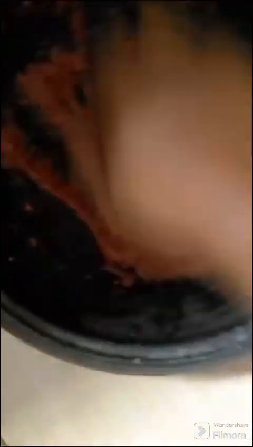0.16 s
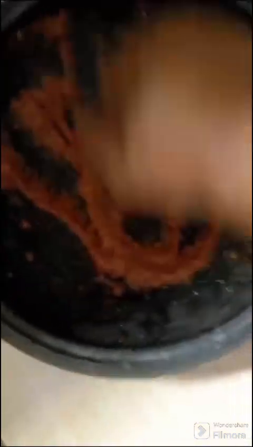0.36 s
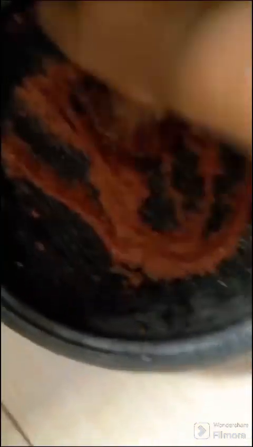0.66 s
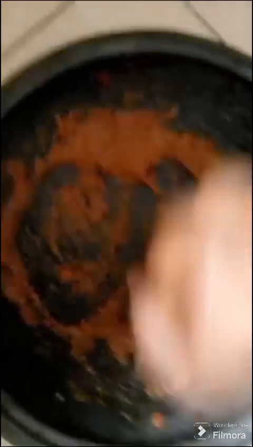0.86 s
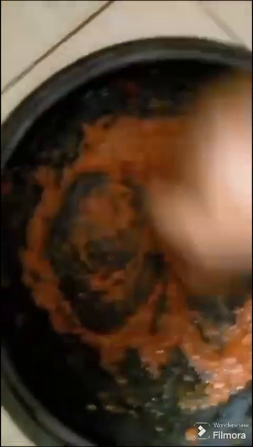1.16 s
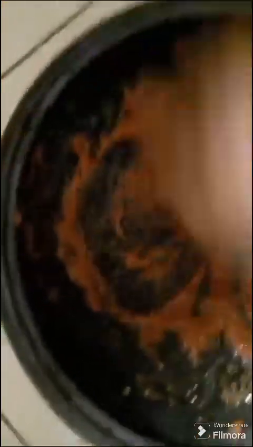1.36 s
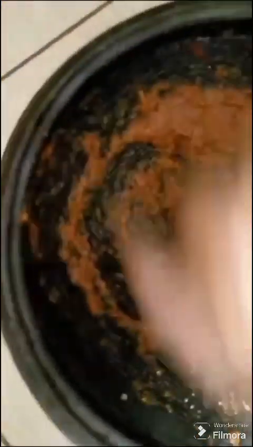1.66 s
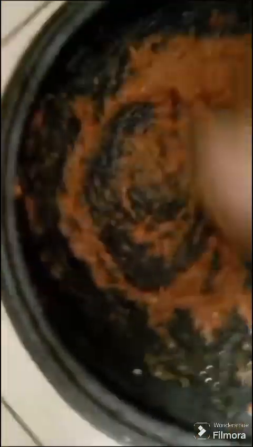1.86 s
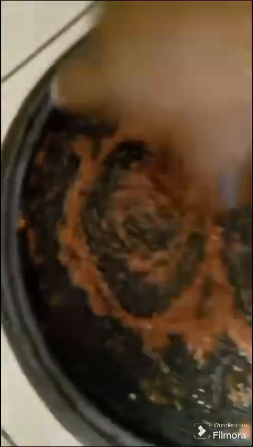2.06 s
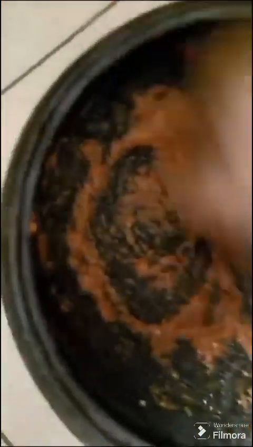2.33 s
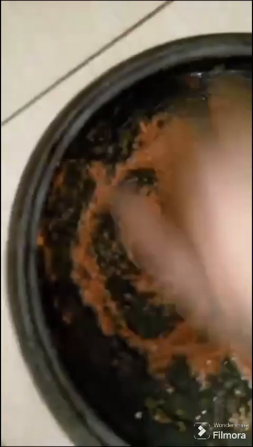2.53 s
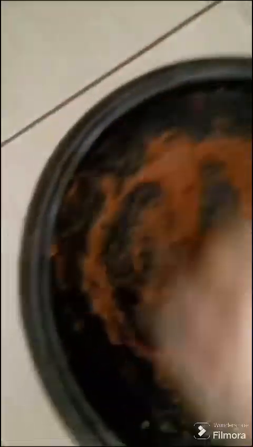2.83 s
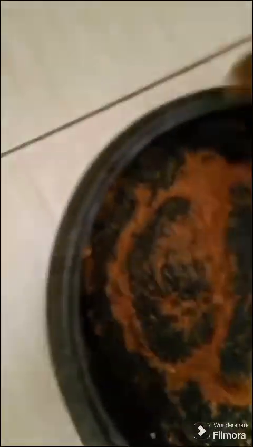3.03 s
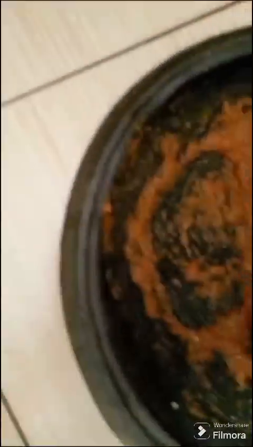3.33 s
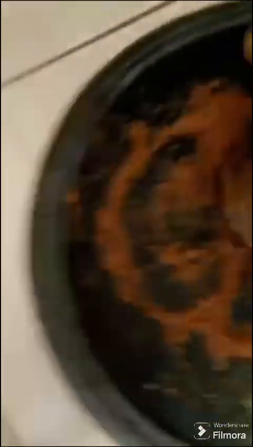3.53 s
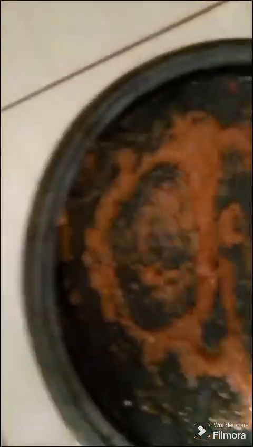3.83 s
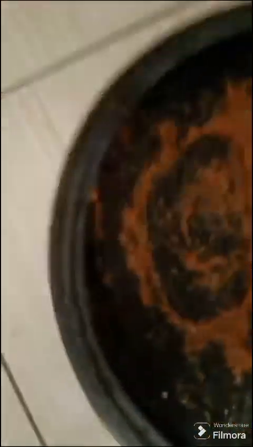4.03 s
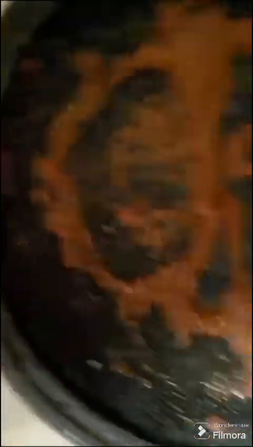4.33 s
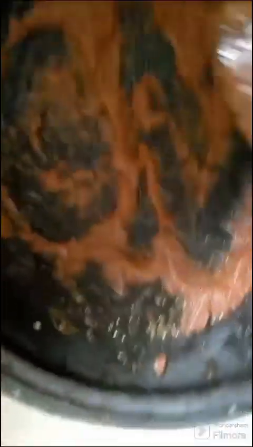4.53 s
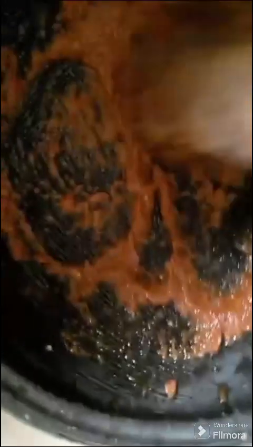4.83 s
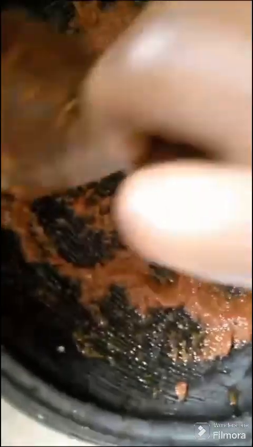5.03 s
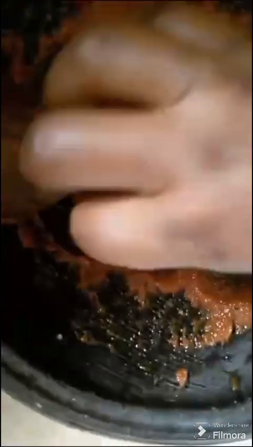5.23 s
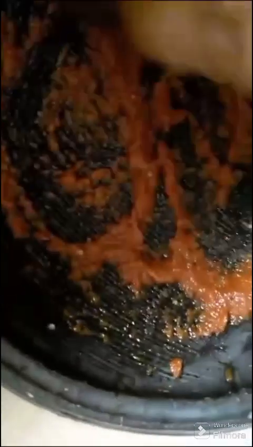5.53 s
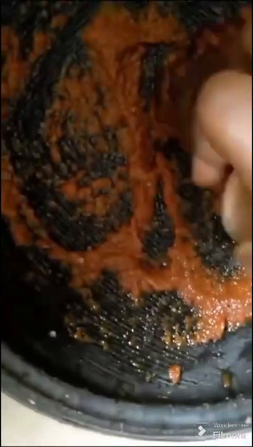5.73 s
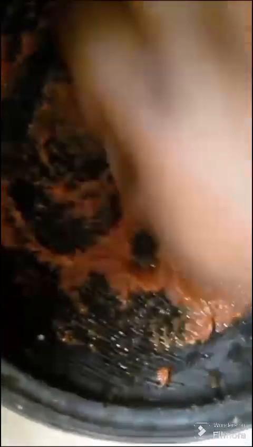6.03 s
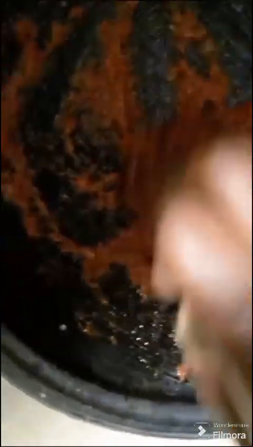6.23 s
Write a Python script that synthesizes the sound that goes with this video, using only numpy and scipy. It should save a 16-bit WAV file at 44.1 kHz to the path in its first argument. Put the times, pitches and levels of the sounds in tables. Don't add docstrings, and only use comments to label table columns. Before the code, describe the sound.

Rapid wet scrapes swell and die every fraction of a second, wood rubbing over rough clay with paste hiss and small crackles. An abrupt tiny gap breaks the early grinding, then heavier thumps and bright knocks join in. A long lull of faint room hum follows, before quieter grinding resumes near the end. The microphone is very close, with faint short reflections from the hard floor and walls.

```python
import sys
import numpy as np
from scipy import signal
from scipy.fft import rfft, irfft
from scipy.io import wavfile
from scipy.ndimage import uniform_filter1d, minimum_filter1d

SR = 44100
rng = np.random.default_rng(int(sys.argv[2]) if len(sys.argv) > 2 else 0)


def natural_amplitude(level_db):
    exponent = np.asarray(level_db, float) / 20
    return 10 ** exponent


def dump(signal):
    limited = np.clip(np.atleast_2d(signal).T, -1, 1)
    pcm = np.round(limited * 32767).astype(np.int16)
    wavfile.write(sys.argv[1], SR, pcm)


N = 281799

# (peak time [s], scrape level
# [dB], rise [s], fall [s], weight on the bowl [dB])
STROKES = [(0.0, -29, .05, 0.025, 1.5), (.09, -41, 0.11, 0.15, -2), (.25, -28.5, 0.069, 0.054, -8.5),
           (.375, -40.5, .05, 0.07, 0.5), (.435, -38.5, 0.077, 0.076, -1), (.575, -38, 0.044, .12, -2),
           (.69, -40, 0.0059, 0.0045, -22), (.85, -39.5, 0.05, 0.13, 3.5), (.96, -46, 0.12, 0.18, -3),
           (1.055, -34.5, 0.058, 0.049, -2.5), (1.21, -36.5, .045, .13, -1.5),
           (1.39, -32.5, 0.047, 0.056, 1.5), (1.56, -36.5, 0.029, 0.099, 3.5),
           (1.66, -40, 0.079, 0.2, -0.5), (1.755, -31.5, 0.059, 0.026, 8), (1.915, -32.5, 0.048, 0.043, 0),
           (2.0, -43, .08, 0.17, -6), (2.066, -32, 0.053, 0.068, -4.5), (2.338, -34.5, 0.05, 0.05, 4.5),
           (2.45, -41, 0.076, 0.09, -3), (2.59, -34, 0.069, 0.059, 6.5), (2.72, -38.5, 0.026, 0.14, 1.5),
           (2.915, -34, 0.044, 0.04, 0), (2.96, -45.5, 0.023, 0.039, 5),
           (3.269, -33, 0.063, 0.074, 9.2), (3.505, -38.5, 0.12, 0.047, 0.7),
                (5.41, -54, .012, .06, 0), (5.48, -48, 0.08, 0.1, 0), (5.681, -43, .11, 0.075, 4.3),
                (6.15, -40.5, 0.085, 0.079, 13.5), (6.378, -65.5, 0.032, .05, 20)]
TOUCHES = [
    (3.56, -57, .04, .085, -6),
    (5.055, -57.5, .06, .12, 1),
]
# (peak time [s], scrape level [dB], fall
# [s], weight on the bowl [dB])
ABRUPT_SOUNDS = [(.553, -43.5, 0.034, -3), (0.685, -44, 0.017, -14), (.82, -44.5, .04, 0.5),
                 (1.193, -36.5, .04, -2.5), (1.545, -38, .03, -0.5), (2.711, -42, .03, 0), (5.002, -66, .04, 8),
                 (5.625, -48, .03, 5), (2.255, -52, 0.035, 16), (3.135, -30.5, 0.056, -3.5),
                 (5.344, -61.5, 0.17, 17), (6.01, -43, 0.078, 6)]

# (middle time [s], rms level [dB], length [s],
# pitch [Hz], width [Hz])
SINGING = [(0.069, -50, 0.078, 2490, 500), (0.276, -33, 0.033, 2048, 70), (0.282, -38, 0.033, 1634, 70),
           (0.378, -35.5, 0.046, 2064, 30), (0.397, -41, .08, 1458, 120), (.6, -60, .1, 2520, 900),
           (0.873, -44, 0.089, 2050, 99), (0.956, -55, 0.1, 4240, 900), (1.058, -33, 0.028, 1527, 200),
           (1.201, -32, 0.021, 1784, 120), (1.24, -50, .05, 2770, 120), (1.394, -41, 0.031, 3470, 200),
           (1.571, -43, 0.063, 2023, 90), (1.893, -36, 0.022, 1720, 120), (1.936, -43, 0.025, 1980, 100),
           (1.97, -50, 0.1, 2725, 100), (2.062, -33, 0.028, 1600, 90), (3.162, -38.5, 0.06, 1420, 200),
           (3.167, -50, 0.045, 1938, 250), (3.233, -30, 0.064, 285, 40), (5.412, -63, 0.036, 2720, 90),
           (5.445, -63, .05, 3600, 90.7), (5.48, -50, 0.09, 2030, 140), (5.671, -48, 0.069, 2710, 152),
           (5.7, -46, 0.07, 1715, 160), (0.047, -42, 0.11, 692, 88.3), (0.857, -38, 0.046, 716, 80.3),
           (1.055, -37, 0.07, 714, 70.2), (1.207, -41, 0.066, 718, 90.3), (1.313, -46.5, 0.068, 696, 69.7),
           (2.051, -37.5, 0.082, 752, 59.7), (2.327, -30.5, 0.078, 273, 40), (2.338, -34, 0.054, 732, 60),
           (2.345, -38.5, 0.063, 1850, 150), (2.982, -38, 0.052, 312.5, 30.2),
           (6.102, -39, 0.047, 1930, 80.6), (6.123, -55.5, 0.038, 2740, 88.5),
           (6.175, -32, 0.047, 1367, 70), (6.21, -39, 0.037, 1964, 90), (6.235, -46.5, 0.048, 1443, 90),
           (2.095, -43, .07, 3600, 250), (5.69, -64, 0.038, 4450, 130), (5.5, -62, 0.08, 3600, 150),
                (6.08, -57, .04, 4650, 300), (6.1, -52, .05, 3450, 120)]

# (time [s], peak level [dB], contact pitch [Hz], bounce delay [s], bounce level [dB])
BLOWS = [(1.3784, -18, 216, 0.0074, -1), (1.7186, 1, 454, 0.0052, -4), (1.894, -19.5, 406, 0.004, -15),
         (2.562, -2.5, 497, 0.0061, -18), (2.8909, -9, 356, 0.0061, -3), (3.2700, -16.5, 380, 0.00474, 0.5),
         (3.2782, -9.5, 640, 0.00394, -6), (3.293, -32, 573, 0.0035, 12), (3.4782, -25.5, 206, 0.0075, 1.3),
         (4.5401, -45, 254.3, 0.0032, -6.5), (5.3353, -20, 484, 0.0039, -9),
         (5.642, -27, 456, 0.0033, -7.5), (6.1778, -24.5, 347, 0.0065, 6.5)]
KNOCKS = [
    (.2569, -10, 1930, 0.008, -6),
    (.4137, -20, 2000, 0.007, -6),
    (.4375, -23, 1770, .0035, -14),
    (1.2015, -25, 1660, .0065, -8),
    (2.2418, -4, 1100, .003, -16),
    (3.1202, 3, 1514, 0.0045, -6),
    (6.0013, -6, 1024, .0045, -15.5),
]
SPLIT_SEED = [
    (2.0805, -6, 3620, .0012, -6),
]
# (time [s], peak level [dB], contact pitch [Hz], bounce delay [s])
GLANCES = [(0.352, -26.5, 270, 0.0036), (.5741, -31.5, 540, 0.0023), (0.8549, -24.5, 370, 0.0023),
           (1.2111, -20, 790, .0067), (1.8592, -16.5, 364, 0.0061), (2.3314, -14.5, 440.6, 0.0044),
           (2.7118, -17.5, 355.3, 0.0062), (2.7403, -18.5, 384, 0.0056), (3.2157, -22, 320.4, 0.0084),
           (3.2865, -20, 500, 0.0066), (3.307, -18, 573, 0.00387), (5.004, -31, 266.5, 0.0064),
           (5.6329, -27.5, 480, 0.0041), (6.087, -29, 507, 0.0024), (6.1475, -24, 480, 0.0051),
           (6.177, -25, 560, .006), (6.21, -33, 420, 0.0036)]
# (time [s], peak level [dB], pitch [Hz],
# t60 [s])
WOKEN = [(0.393, -33, 128, 0.14), (0.591, -25, 92, 0.05), (1.7188, -5.5, 290.7, 0.11),
         (1.7186, -18, 473, .07), (1.7184, -9.5, 684, 0.11), (1.7204, -27, 167, 0.11),
         (1.72, -20, 1660, .04), (2.2418, -29, 790, 0.051), (2.2418, -27, 2670, 0.026),
         (2.2416, -28.5, 2020, .04), (2.561, -17, 162, 0.17), (2.562, -14, 294, 0.087),
         (2.562, -14.5, 558, 0.088), (2.562, -14.5, 722.7, 0.11), (2.7134, -27.5, 125.5, 0.23),
         (2.8926, -17, 175, 0.082), (2.8895, -16.5, 285, 0.11), (3.1196, -6, 1250, 0.022),
         (3.1191, -11, 1620, 0.053), (3.121, -16.5, 2720, 0.029), (3.1202, -32, 797, 0.09),
         (3.477, -31, 75.7, 0.1), (5.3353, -31.5, 721, 0.08), (5.336, -32.5, 163.6, 0.059),
         (5.3346, -41.5, 1710, 0.071), (5.3333, -46.5, 2697, 0.068), (6.0007, -26.5, 316, 0.18),
         (6.0008, -33, 165, 0.14), (6.0024, -29, 2670, 0.044), (6.0018, -30.5, 1930, 0.052),
         (.2565, -21, 1635, .06), (.2565, -21, 2050, .07), (.2565, -28, 285, .05), (.2655, -24, 720, .04),
          (.4135, -30, 2050, .05), (.4365, -29, 2000, .05), (.4365, -31, 1400, .05),
          (.6865, -33, 1950, .04), (.6865, -35, 3000, .03), (.8545, -28, 1500, .04),
          (1.913, -27, 1600, .04), (1.932, -27, 1900, .04), (2.056, -27, 1620, .07),
          (2.081, -28, 1400, .04), (2.803, -36, 3600, .02), (2.915, -31, 1620, .08),
          (2.915, -30, 2050, .08), (3.51, -34, 1620, .05), (3.518, -36, 2050, .04), (5.005, -38, 300, .12),
          (5.365, -36, 300, .06), (5.43, -38, 300, .06), (5.624, -36, 700, .05), (5.676, -36, 2720, .06),
          (6.155, -26, 1400, .06)]
# (pitch [Hz], width [Hz], level [dB])
BOWL = [(126, 49, -0.5), (166, 22, 5), (232, 45, 2), (306.5, 33, 7), (422.4, 27, -4), (550, 32, 1),
        (643, 44, 0), (715, 33.3, 4.5), (824, 80, -3), (1173, 90, -14), (1350, 84, -20), (1450, 340, -4),
        (1508, 20, -1.5), (1635, 32, -1), (1941, 240, -6), (1850, 40, -7), (2086, 87, -2.5),
        (2720, 220, -5.5), (3080, 280, -13.5), (3517, 200, -12), (4360, 550, -15), (5300, 1400, -21),
        (7000, 690, -32.5)]

# (time [s], peak level [dB], pitch [Hz], broad tick against the peak
# [dB])
POPS = [(0.2334, -13, 4970, -7), (0.553, -38, 4200, 0), (0.616, -30.5, 10000, 5), (0.729, -43.5, 4640, -7),
        (1, -42, 4800, -3.5), (1.011, -41.5, 4600, -7), (1.1224, -39, 4500, -6), (1.6194, -31.5, 5520, 4.5),
        (1.639, -27.5, 8500, -0.5), (1.7466, -21.5, 10850, -1), (1.7531, -21.5, 5830, 3),
        (1.972, -38, 4700, -24.5), (2.2404, -42, 3360, -1), (2.5861, -21, 5200, 0),
        (2.605, -27.5, 11200, -9.5), (2.956, -37, 11900, -10), (2.803, -32, 4300, -8),
        (3.1218, -27.5, 4950, -4), (3.412, -41, 5030, 0), (4.999, -54.5, 3000, 9), (5.3338, -58, 5300, 8),
        (5.4016, -60, 4460, -2), (5.678, -48, 3580, 3), (6, -45, 2770, 6), (6.362, -58, 5490, 13),
        (4.119, -43, 9700, -3),
]
# (time [s], peak level [dB], broad tick against the peak [dB])
SEEDS = [(.0473, -41, -19), (.0852, -36, -13), (0.109, -33, -8), (0.185, -33, -6), (0.2566, -24, -10),
         (0.411, -27.5, -25), (.6847, -37, -12), (.856, -38.5, -18), (.9208, -43, 1), (.978, -40, -8),
         (1.0524, -33, 5), (1.1224, -40, -9.5), (1.1897, -32, 0), (1.2645, -37, 2.5), (1.3785, -30.5, -16),
         (1.3991, -27.5, -12), (1.5436, -38, 0.5), (1.6013, -37, -1.5), (1.905, -28, -19.5),
         (2.025, -40.5, -15), (2.055, -26, 0), (2.0802, -24.5, 13.5), (2.4637, -33, 6),
         (2.548, -32.5, 11.5), (2.571, -36, 3), (2.7065, -38.5, 5), (2.7887, -36, 8), (2.8947, -36, 6),
         (3.1183, -17.5, -17.5), (3.246, -48, 12)]

# (frequency [Hz], level [dB per Hz])
PASTE = [(3240, -4.5), (5500, -9.5), (6280, -18), (6970, -3.5), (7710, 1.5), (9120, -6), (9900, -5.5),
         (10900, -6), (12000, -2), (14400, -12), (15400, -12.5), (16100, -2), (16400, -18.5)]
# (frequency [Hz], level [dB per Hz])
SHADED_PASTE = [(3240, -32), (5500, 1.5), (6910, 1.5), (7810, -8), (8800, -10), (11100, -0.5), (15100, 5.5),
                (16100, 8.5), (16400, -38)]
# (frequency [Hz], t60 [s])
ROOM = [(100, .65), (400, .46), (1500, .6), (4000, .65), (12000, .2)]
# (delay [s], level [dB])
ECHOES = [
    (.008, -13),
    (0.012, -19.5),
    (0.018, -18),
]
# (frequency [Hz], level [dB per Hz])
AIR = [(15, -61), (25, -18.5), (49, -4.5), (87, -4), (119, 1), (152, -5), (305, 3), (361, -9.5), (402, -7),
       (601, -14.5), (723, -7.5), (1000, -9.5), (1300, -33), (2200, -120)]
# (frequency [Hz], level [dB per Hz])
HISS = [(590, -31), (1000, -1), (1230, -5), (2410, -8), (3980, -15), (4900, -10), (9600, -12), (16000, -15)]

SHADED_UNTIL_S = 0.586
SCENE_CHANGE_S, GAP_S = 0.762, 0.034
SWELL_DB, GRIT_SWELL_DB, WET_SWELL_DB = 15, 14.5, 10
ROUND, WET_ROUND = 1.4, 2.1
GRIT_DB, WET_DB = -49, -50.8
GRIT_FOLLOW, WET_FOLLOW = 0.85, 0.7
WANDER_DB = 2.5
PATCH_DB = 2.5


def grinding():
    t = np.arange(N) / SR
    scrape, weight, grit, wet_gain = effort(t)
    ridges = slips(1200, 3.6, 1.1)
    judder = natural_amplitude(2.8 * evened(band(rng.standard_normal(N), 12, 90)))
    layers = [(ridges, 950, 3300, scrape),
              (slips(300, 2.2, 0.7), 105, 950, weight),
              (ridges + 1.3 * slips(2600, 4.4, 1.1), 3300, 7000, grit)]
    jolts = np.zeros(N)
    for drive, lo_hz, hi_hz, gain in layers:
        uneven = drive * judder
        loudness = np.std(signal.oaconvolve(band(uneven, lo_hz, hi_hz), bowl()))
        jolts += band(uneven * gain, lo_hz, hi_hz) / loudness

    crackle = signal.lfilter([1], [1, -np.exp(-1 / (SR * 0.005))], abs(ridges) > 13)
    fizz = (0.15 * ridges + slips(3000, 3.6, 1.3)) * np.sqrt(judder) * (1 + crackle)
    shaded = coloured(fizz, SHADED_PASTE)
    wet = np.where(t < SHADED_UNTIL_S, shaded, coloured(fizz, PASTE)) * wet_gain

    shake = rng.standard_normal(N)
    rumble = band(shake * np.sqrt(scrape * weight), 38, 73) / np.std(band(shake, 35, 95))
    return wandering(jolts) + patchy(wet) + natural_amplitude(-17.5) * rumble


def effort(t):
    steps = t[::64]
    wet = STROKES + TOUCHES
    abrupt_sounds = [(s, db, 0.004, fall, weight_db) for s, db, fall, weight_db in ABRUPT_SOUNDS]
    scrape, weight = swell(wet + abrupt_sounds, steps, SWELL_DB, ROUND) - 40
    grit = GRIT_DB + swell(wet, steps, GRIT_SWELL_DB, ROUND, GRIT_FOLLOW)[0]
    paste = WET_DB + swell(wet, steps, WET_SWELL_DB, WET_ROUND, WET_FOLLOW)[0]
    outside_gap = (t < SCENE_CHANGE_S) | (t > SCENE_CHANGE_S + GAP_S)
    return [natural_amplitude(np.interp(t, steps, level)) * outside_gap for level in (scrape, weight, grit, paste)]


def swell(rows, t, drop_db, bend, follow=1):
    s, db, rise, fall, weight_db = np.transpose(rows)[:, :, None]
    away = np.maximum((s - t) / rise, (t - s) / fall)
    power = natural_amplitude(2 * (follow * (db + 40) - drop_db * away ** bend))
    weighted = power * natural_amplitude(2 * weight_db)
    return 10 * np.log10(np.array([power.sum(0), weighted.sum(0)]) + 1e-7)


def slips(per_s, spread_db, smooth):
    when, size, sign = rng.random((3, N))
    strength = natural_amplitude(-spread_db * np.log(np.maximum(size, 0.03)))
    jolts = (when < per_s / SR) * strength * np.sign(sign - 0.5)
    return evened(jolts) + smooth * rng.standard_normal(N)


def wandering(jolts):
    steps = np.arange(0, N + 2000, 2000)
    drift = rng.standard_normal((len(BOWL), len(steps)))
    drift = uniform_filter1d(drift, size=2, axis=1) * np.sqrt(2)
    shares = natural_amplitude(WANDER_DB * drift - np.log(10) / 20 * WANDER_DB ** 2)
    out = np.zeros(N)
    for share, ring in zip(shares, modes()):
        driven = jolts * np.interp(np.arange(N), steps, share)
        out += signal.oaconvolve(driven, ring[:4000])[:N]
    return out


def patchy(x):
    z = signal.stft(x, nperseg=256)[2]
    patches = uniform_filter1d(rng.standard_normal(z.shape), size=7, axis=0)
    patches = evened(uniform_filter1d(patches, size=14, axis=1))
    gain = natural_amplitude(PATCH_DB * patches - np.log(10) / 20 * PATCH_DB ** 2)
    return signal.istft(z * gain, nperseg=256)[1][:N]


def singing():
    out, t = np.zeros(N), np.arange(-8000, 8000) / SR
    for s, db, length, hz, width in SINGING:
        a, b = rng.standard_normal((2, 16000))
        slow = signal.lfilter([1], [1, -np.exp(-np.pi * width / SR)], a + 1j * b)
        steadied = slow / np.sqrt(abs(slow))
        tone = evened((steadied * np.exp(2j * np.pi * hz * t)).real)
        tone = tone * natural_amplitude(db) * np.exp(-(2 * t / length) ** 2)
        add(out, max(s - 8000 / SR, 0), tone[max(8000 - round(s * SR), 0):])
    return out


def knocks(rows, ring_db, cycles, edge_db, push_db):
    out = np.zeros(N)
    for s, *row in rows:
        add(out, s - 300 / SR, hit(*row, ring_db, cycles, edge_db, push_db))
    return out


def hit(db, hz, bounce_s, bounce_db, ring_db, cycles, edge_db, push_db):
    t = np.arange(-300, 300) / SR
    pulse = -np.exp(-(t * hz * 2 / cycles) ** 2) * np.cos(2 * np.pi * hz * t)
    pulse = pulse - pulse.sum() * np.hanning(600) / 299.5
    pulse = np.pad(pulse, (0, 8000))
    edge = natural_amplitude(edge_db) * t * 9000 * np.exp(-(t * 9000) ** 2)
    push = natural_amplitude(push_db) * np.exp(-(t * 700) ** 2)
    force = pulse + np.pad(edge - push, (0, 8000))
    ring = signal.oaconvolve(force, bowl())[:len(pulse)]
    once = pulse + natural_amplitude(ring_db) * ring / abs(ring).max()
    bounce = natural_amplitude(bounce_db) * np.roll(pulse, round(bounce_s * SR))
    return natural_amplitude(db) * (once + bounce)


def woken():
    out, t = np.zeros(N), np.arange(12000) / SR
    for s, db, hz, t60 in WOKEN:
        build_up = 1 - np.exp(-t / 0.0021)
        add(out, s, -natural_amplitude(db - 60 * t / t60) * build_up * np.cos(2 * np.pi * hz * t))
    return out


def bowl():
    return modes().sum(0)


def modes():
    t = np.arange(8000) / SR
    rings = []
    for k, (hz, width, db) in enumerate(BOWL):
        decay = np.exp(-np.pi * width * t)
        rings.append((-1) ** k * natural_amplitude(db) * width * decay * np.sin(2 * np.pi * hz * t))
    rings = np.array(rings)
    return rings / np.linalg.norm(rings.sum(0))


def pops():
    out, t = np.zeros(N), np.arange(1500) / SR
    seeds = [(s, db, 3350, tick_db) for s, db, tick_db in SEEDS]
    for s, db, hz, tick_db in POPS + seeds:
        t60 = 0.011 * natural_amplitude(-0.3 * (max(db, -40) + 30))
        burst = rng.standard_normal(1500) * natural_amplitude(-60 * t / t60)
        tone = band(burst, hz * 0.857, min(hz * 1.12, 16000))
        tick = band(burst, 5500, 15800)
        add(out, s, natural_amplitude(db) * (tone / abs(tone).max() + natural_amplitude(tick_db) * tick / abs(tick).max()))
    return out


def room(x):
    taps = np.zeros(SR)
    at = np.arange(300, SR - 20, 20)
    taps[at + rng.integers(0, 20, len(at))] = rng.choice([-1., 1.], len(at))
    hz, t, z = signal.stft(taps, SR, nperseg=256)
    decay = natural_amplitude(-60 * t / read(ROOM, hz)[:, None])
    tail = signal.istft(z * decay, SR, nperseg=256)[1]
    tail *= natural_amplitude(-12.0) / np.linalg.norm(tail)
    for s, db in ECHOES:
        add(tail, s, natural_amplitude(np.array([db])))
    before = np.arange(N) < SCENE_CHANGE_S * SR
    first = signal.fftconvolve(x * before, tail)[:N] * before
    return first + signal.fftconvolve(x * ~before, tail)[:N]


def air():
    drift = evened(uniform_filter1d(rng.standard_normal(N), 6000))
    hum = natural_amplitude(-63.5 + 1.5 * drift) * coloured(rng.standard_normal(N), AIR)
    return hum + natural_amplitude(-74.5 + drift) * coloured(rng.standard_normal(N), HISS)


def evened(x):
    return x / np.sqrt(np.mean(x ** 2) + 1e-20)


def read(points, hz):
    f, value = np.transpose(points)
    return np.interp(np.log(hz + 1), np.log(f + 1), value)


def coloured(x, points):
    gain = natural_amplitude(read(points, np.fft.rfftfreq(N, 1 / SR)))
    return evened(irfft(rfft(x) * gain, N))


def band(x, lo_hz, hi_hz):
    return signal.sosfilt(signal.butter(3, [lo_hz, hi_hz], "bandpass", fs=SR, output="sos"), x)


def add(mix, s, sound):
    part = mix[round(s * SR):][:len(sound)]
    part += sound[:len(part)]


def scene():
    glances = [(*row, -7) for row in GLANCES]
    struck = woken()
    struck += knocks(BLOWS, ring_db=-8.5, cycles=0.8, edge_db=3, push_db=-2.5)
    struck += knocks(glances, ring_db=-9.5, cycles=0.8, edge_db=4.3, push_db=-18.5)
    struck += knocks(KNOCKS, ring_db=-7.5, cycles=1.79, edge_db=-0.69, push_db=-28.0)
    split = knocks(SPLIT_SEED, ring_db=-15, cycles=4.4, edge_db=-13, push_db=-35)
    popped = pops()
    rubbed = grinding() + singing()
    direct = struck + split + popped + rubbed
    to_walls = struck + 0.1 * split + 0.3 * popped + 0.5 * rubbed
    return (direct + room(to_walls) + air())[None]


def roll_off(x):
    return signal.sosfilt(signal.butter(12, 16500, fs=SR, output="sos"), x)


def record(dry):
    thin = signal.sosfilt(signal.butter(1, 40, "highpass", fs=SR, output="sos"), dry)
    edged = signal.oaconvolve(thin, signal.firwin(255, 16050, fs=SR)[None], "same")
    headroom = minimum_filter1d(np.minimum(0.97 / (abs(edged) + 1e-9), 1), size=400)
    limited = edged * uniform_filter1d(headroom, size=300)
    return roll_off(limited)


dry = scene()
out = record(dry)
dump(out)
```